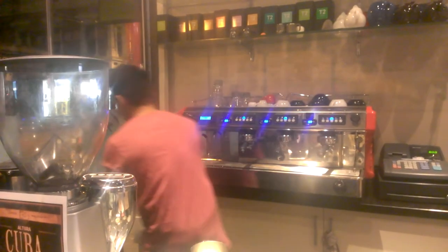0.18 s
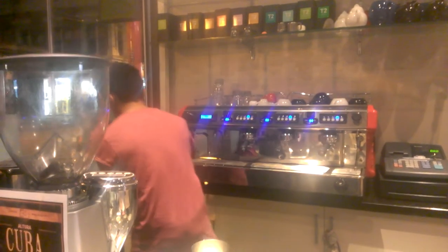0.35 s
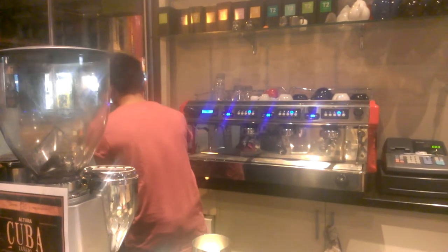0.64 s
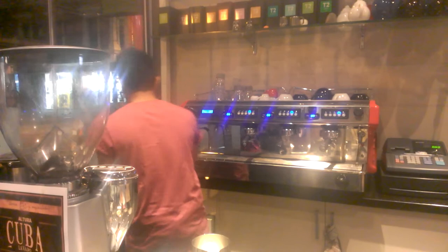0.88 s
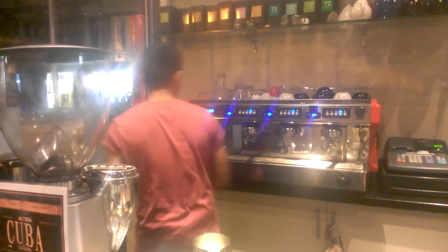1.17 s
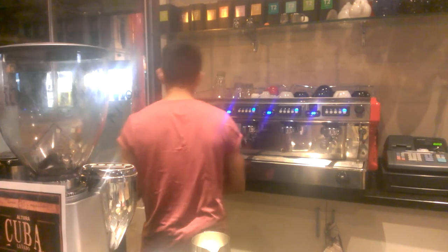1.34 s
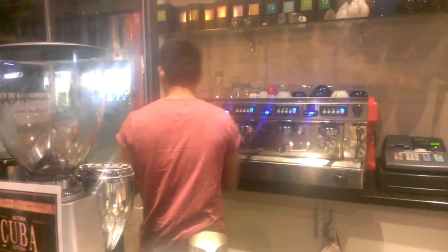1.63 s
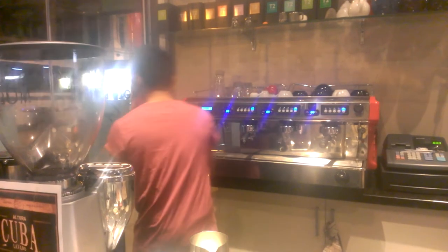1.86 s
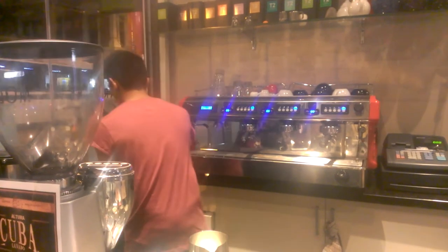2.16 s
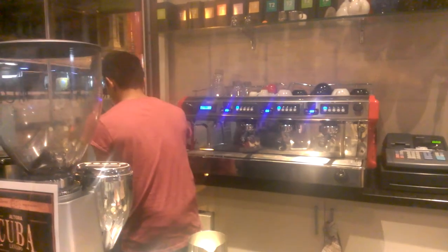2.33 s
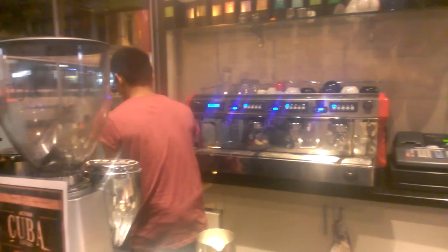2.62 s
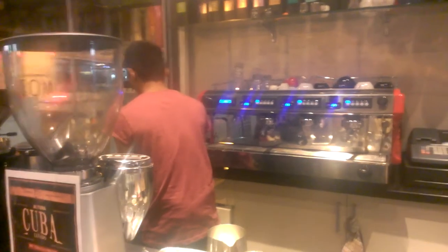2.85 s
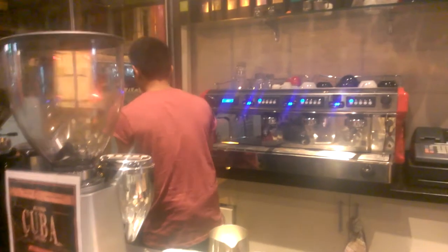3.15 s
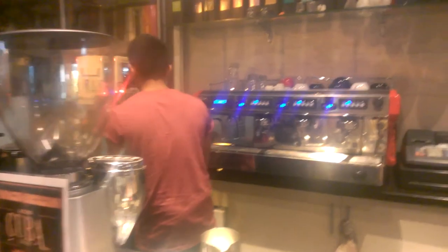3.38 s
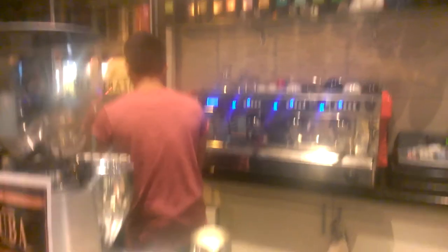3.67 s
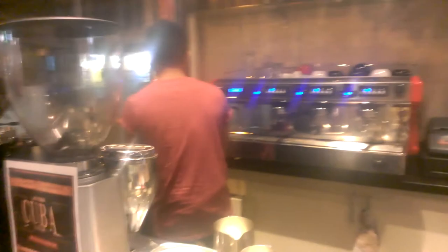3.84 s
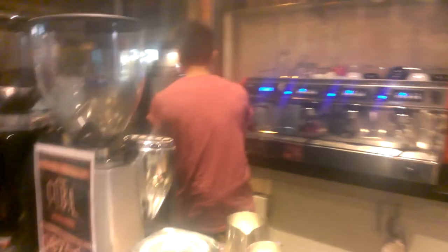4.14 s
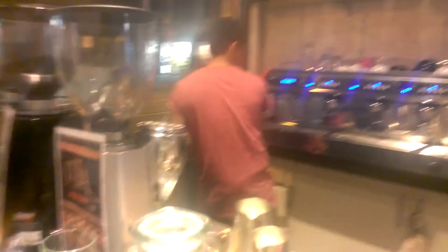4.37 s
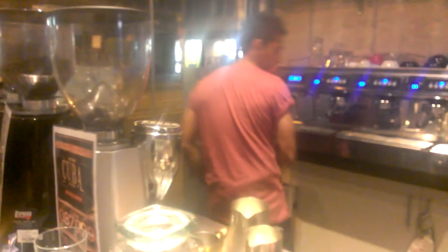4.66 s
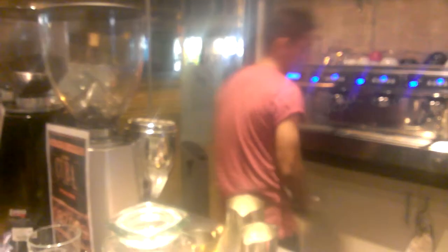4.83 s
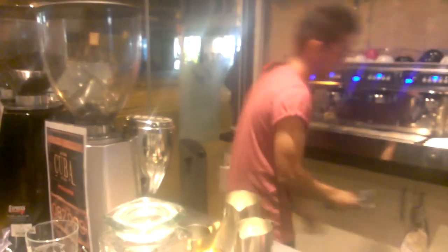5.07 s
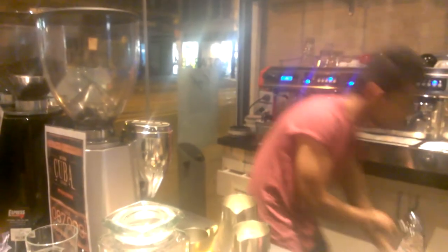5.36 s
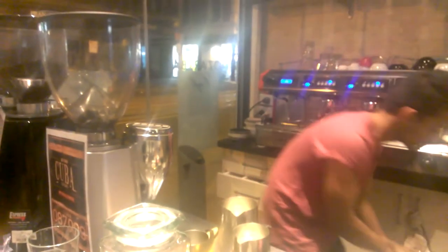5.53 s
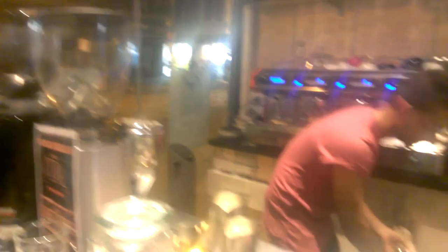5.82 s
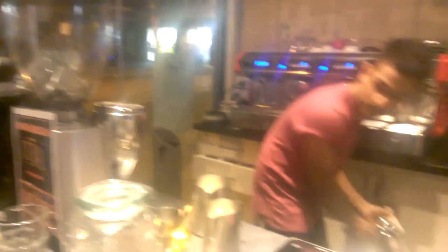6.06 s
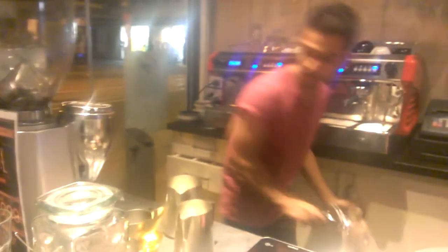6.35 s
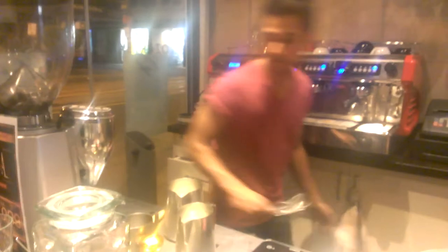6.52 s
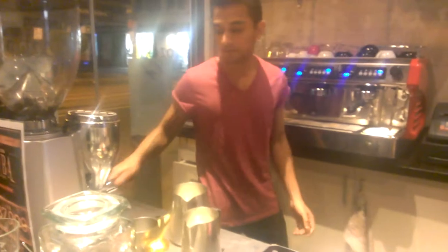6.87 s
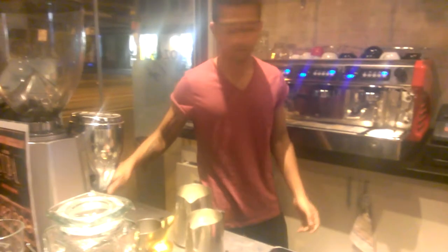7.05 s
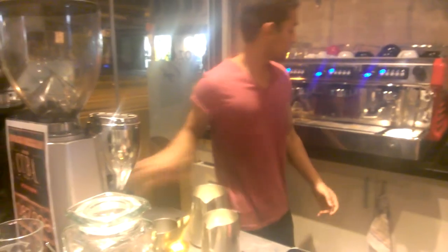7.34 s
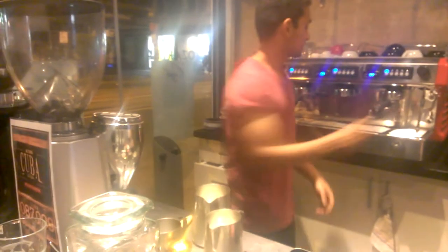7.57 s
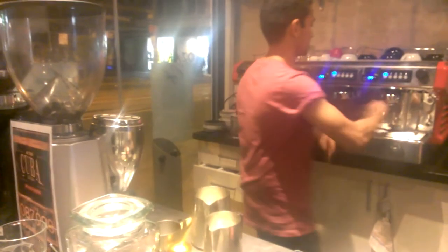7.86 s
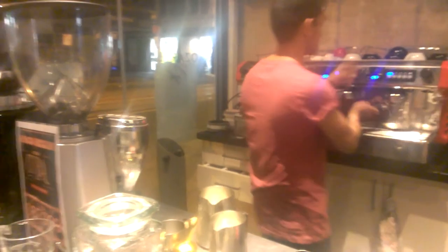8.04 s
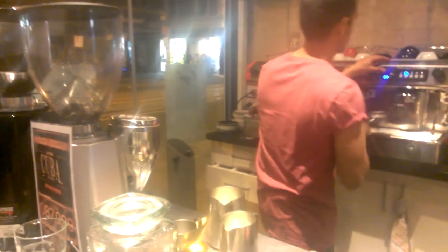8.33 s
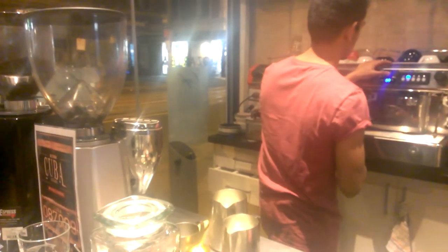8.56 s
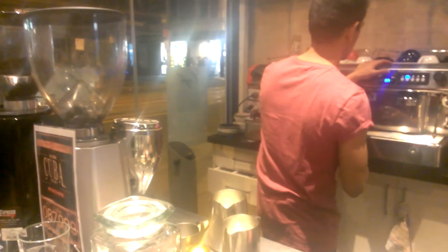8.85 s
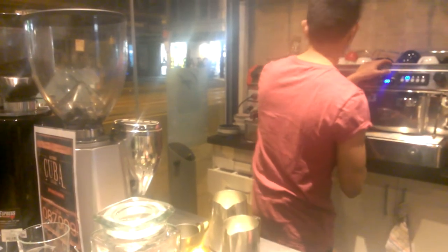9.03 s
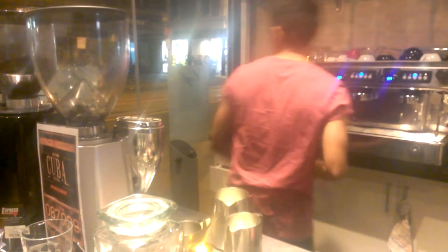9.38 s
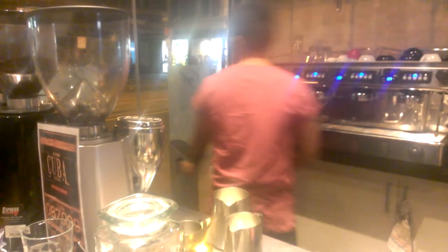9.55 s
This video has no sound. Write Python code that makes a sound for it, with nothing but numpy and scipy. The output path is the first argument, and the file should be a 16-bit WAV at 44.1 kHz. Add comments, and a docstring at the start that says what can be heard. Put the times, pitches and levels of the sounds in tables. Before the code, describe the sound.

In a hard-walled cafe, a steel filter handle bangs a knock box three times, pauses, then bangs five more times, each blow cracking, ringing and thudding with a quick rebound. Dry ticks, a faint squeak and one bright clank follow. Something lands rocking on the hollow near counter, a handle rattles, steel clinks, and a soft water hiss ends in a valve snap. Handling rustles and low ventilation throughout; the loudest blows sound squashed.

```python
"""In a hard-walled cafe a barista knocks a steel portafilter on a knock box in two bursts: crack, ring and thud.
Dry ticks follow close by, then a narrow squeak and a clank on the machine, both of steel.
Something lands and rocks on the hollow near counter; a handle rattles, steel clinks, and a short flush
of filtered noise with pump tones ends in a valve snap.
Throughout, rustles come and go over ventilation, rumble, drone and hum; a limiter flattens the loudest blows."""
import sys
import numpy as np
from scipy import signal
from scipy.fft import rfft, irfft, next_fast_len
from scipy.io import wavfile
from scipy.ndimage import uniform_filter1d

SR = 44100
rng = np.random.default_rng(int(sys.argv[2]) if len(sys.argv) > 2 else 0)


def put_to_file(sound):
    """Save the sound as 16-bit audio at rate SR, in the file named by the first command-line argument."""
    columns = np.atleast_2d(sound).T  # one column per channel
    safe = np.clip(columns, -1, 1)
    whole_steps = np.round(safe * 32767)
    wavfile.write(sys.argv[1], SR, whole_steps.astype(np.int16))


N = 427769
TAIL = 57344   # samples per struck sound
AGE, TIME = np.arange(TAIL) / SR, np.arange(N) / SR   # s

# Colours are relative spectral densities; mode and ring levels are relative too.
# Blows on the knock box: t/s, level/dB, treble tilt/(dB/octave), box thud/dB, thud f/Hz,
# rim ring/dB, basket ring/dB, loose-grip ring/dB, rebound delay/s
KNOCKS = [(.251, 2.5, 0, -15, 143, -6.5, -10, -14, .012),
          (.417, -0.5, -0.2, -13.5, 111, -6.5, -21, 0.5, 0.013), (.582, 0, 1, -12, 123, -9, -17, 0, 0.015),
          (2.179, 3.5, -0.3, -10.5, 115, -9, -8.5, -23, 0.015),
          (2.346, -2, 0.4, -10.5, 118, -14, -26, -18, .012),
          (2.511, 2, 1.4, -12.5, 148, -3.5, -4, -15, .049), (2.702, 0.5, .5, -9, 160, -4, -6, -12, .018),
          (2.907, -1, 1.7, -8.5, 163, -11, -4, -14, .016)]
# Crack of a blow: f/Hz, density/dB
KNOCK_COLOUR = [(150, -32), (330, -12), (530, -13), (790, -12), (1150, -8.5), (1600, -1.5), (2100, 2.5),
                (2650, -1), (3400, -7), (4400, 1), (5500, 0), (6500, -8.5), (7900, -23.5), (9100, -16.5),
                (11000, -27.5), (16000, -35)]
# Heavy rim of the portafilter: f/Hz, level/dB, t60/s
RIM_MODES = [(818, -7, 0.08), (1255, -5, 0.029), (1631, 0.5, 0.16), (1809, 0.5, 0.18), (2006, 3.5, 0.13),
             (2174, -2.5, 0.25), (2422, 8, 0.088), (2650, 2, 0.1), (3000, -6.5, 0.23)]
# Thin basket: f/Hz, level/dB, t60/s
BASKET_MODES = [(4230, 10.5, 0.16), (4410, -4, 0.28), (4620, 2, 0.44), (4820, -9, 0.24), (5300, -8, 0.16),
                (5530, -16, 0.14), (6470, -5, 0.27), (7250, -6.5, 0.1), (9000, -28, 0.3), (9400, -29, 0.14),
                (11400, -14, 0.12)]
# Low rim note that sings on in a loose grip: f/Hz, level/dB, t60/s
RIM_NOTE = [(2000, 3, .26), (2100, -4.5, 0.2)]
# Low basket note that sings on in a loose grip: f/Hz, level/dB, t60/s
BASKET_NOTE = [(4205, 0, .7)]
# Rebound relative to the first contact
REBOUND_DB, REBOUND_THUD_DB, REBOUND_TILT_DB_PER_OCT = -3.5, -10, -2.1
# Graze just before the first blow after a pause, relative to that blow
PAUSE_S, GRAZE_LEAD_S, GRAZE_DB, GRAZE_TILT_DB_PER_OCT = .8, .008, -12.5, -3

# Portafilter against the machine's steel: t/s, level/dB
CLANKS = [(4.271, -15.5), (4.276, -2)]
# Clank impact: f/Hz, density/dB
CLANK_COLOUR = [(100, -8), (380, -16), (780, -7), (1200, -10), (1750, 0), (2650, 1.5), (3100, -9),
                (3750, -9.5), (4250, -1.5), (5200, -1.5), (6200, -9.5), (7100, -9.5), (8000, -27),
                (9300, -20.5), (16000, -43)]
# Clank ringing: f/Hz, level/dB, t60/s
CLANK_MODES = [(1460, -5, 0.22), (1840, -7, 0.57), (2080, -7, 0.27), (2560, 0, 0.18), (2543, -4, .22),
               (2800, -2.5, 0.2), (4330, -12, 0.27), (5230, -16, .25), (6759, -2.5, 0.22), (8620, -18, .14),
               (9050, -11, 0.18)]

# Something lands and rocks on the counter: t/s, hollow thump/dB, clatter/dB, clatter tilt/(dB/octave)
BUMPS = [(7.070, -12.5, -23.5, -1.5), (7.079, -19, -24.5, 1.5), (7.106, -16, -30, -1),
         (7.130, -16.5, -25.5, 1), (7.155, -17.5, -26.5, -3), (7.184, -37, -17.5, -4),
         (7.210, -29, -24.5, -7.5)]
# Hollow counter panel: f/Hz, level/dB, t60/s
COUNTER_MODES = [(205, -7.5, 0.11), (327, 1, 0.12), (364, -2.5, 0.09), (430, 0.5, 0.045), (553, -16, 0.029)]
# Clatter impact: f/Hz, density/dB
CLATTER_COLOUR = [(150, -1), (600, 0), (850, -2.5), (1080, 0), (1400, -2), (2300, -1), (3000, -10),
                  (3800, -11), (5100, -2.5), (7500, -22), (8300, -19), (9500, -31), (16000, -36)]
# Ringing of the thing on the counter: f/Hz, level/dB, t60/s
CLATTER_MODES = [(680, 17, 0.039), (1075, 8, 0.11), (1700, -10, 0.052), (2360, -6, 0.037), (5050, -38, .05),
                 (6720, -18, 0.062), (8200, -23, .09)]
CLATTER_RING_DB = -16   # against its crack

# Bright steel touches at the group head: t/s, level/dB, treble tilt/(dB/octave), ring/dB
CLINKS = [(8.269, -29, 1.5, -1), (8.282, -11.5, 3, -6)]
# Clink impact: f/Hz, density/dB
CLINK_COLOUR = [(300, -1.5), (900, -5), (1300, -2), (1700, 5.5), (2100, -1), (2550, -4), (3300, -8.5),
                (4500, -1), (5900, 3.5), (6700, -9), (7900, -15), (9300, -4.5), (11000, -14), (16000, -28)]
# Clink ringing: f/Hz, level/dB, t60/s
CLINK_MODES = [(1590, -4, .25), (1800, -7, 0.31), (2520, -10, .25), (4600, -15, .2), (5114, -16, 0.17),
               (5970, 10, 0.12), (5780, -1, 0.19), (5740, -1, 0.32), (8802, -13, 0.14), (9200, -12, 0.16),
               (9400, -14, .18), (10360, -15, .16)]

# Water through the group head: f/Hz, density/dB
FLUSH_COLOUR = [(300, 7), (1700, 3), (3200, -2.5), (5100, 3), (7000, 1), (8500, -14), (10200, -15),
                (16000, -28)]
# Pump tones during the flush: f/Hz, level against the water/dB
PUMP_TONES = [(490, -8), (5120, -11.5), (5798, -17)]
# Rise and drain times are per SWELL_RANGE_DB
FLUSH_S, FLUSH_DB, FLUSH_RISE_S, FLUSH_SAG_DB_PER_S, DRAIN_S = 8.47, -49.5, .08, 7, 0.35
VALVE_S, VALVE_DB = 8.944, -21
# Valve snap: f/Hz, density/dB
VALVE_COLOUR = [(300, -15), (620, -32), (760, -5), (1100, -12), (1700, -1.5), (2300, 0), (3200, -0.5),
                (3900, -2), (4600, -3), (5800, -5), (7000, -14), (8300, -19), (9200, -11), (10000, -21),
                (16000, -29)]
# Valve ringing: f/Hz, level/dB, t60/s
VALVE_MODES = [(2230, 2, 0.33), (3128, -4, 0.44), (4700, 0, .25), (5717, -6, .3), (9400, -8, 0.23)]

# Light touches of a loose machine handle: t/s, level/dB
JIGGLES = [(7.872, -38), (7.897, -39), (7.952, -44)]
# Handle ringing: f/Hz, level/dB, t60/s
HANDLE_MODES = [(822, 8, .12), (1650, -3, .15), (2060, 3, 0.052), (3340, -4, .15), (4500, -2, .15),
                (5430, -9, .1)]

SQUEAK_S, SQUEAK_DB, SQUEAK_RISE_S, SQUEAK_FADE_S = 4.2, -51.5, .05, .3
# Squeak: f/Hz, density/dB
SQUEAK_COLOUR = [(900, -30), (1150, -13), (1450, -31), (1650, 12), (1900, -9), (2500, -41)]

# Dry ticks near the microphone: t/s, level/dB
TICKS = [(3.511, -31), (3.522, -42), (3.742, -48)]
# Tick: f/Hz, density/dB
TICK_COLOUR = [(1000, -38), (3500, -14), (5300, 8), (8500, -5), (11000, -18), (16000, -28)]

# Handling rustles: t of peak/s, level/dB, fade/s
RUSTLES = [(.07, -63, 0.14), (1.35, -57, 0.49), (1.73, -61, .6), (4.8, -49, 0.3), (4.94, -47.5, 0.19),
           (5.34, -49.5, 0.29), (6.19, -53, 0.13), (6.38, -54.5, 0.61), (6.7, -55, 0.11),
           (7.72, -54.5, 0.3), (7.93, -47.5, 0.38), (9.62, -52.5, 0.3)]
# Rustle: f/Hz, density/dB
RUSTLE_COLOUR = [(800, 1), (3300, -7), (4600, 4), (6200, -2), (8000, -15.5), (12000, -25), (16000, -30)]
RUSTLE_RISE_PER_FADE = 0.49
SWELL_RANGE_DB = 20

# Ventilation: f/Hz, density/dB
AIR_COLOUR = [(20, -5), (45, -4.5), (70, -15), (100, -19), (135, -13), (190, -21), (270, -15.5),
              (400, -20.5), (850, -21.5), (1150, -24), (1700, -20), (3200, -32), (4700, -28), (6000, -34),
              (7800, -59), (16000, -64)]
# Ventilation: t/s, level/dB
AIR_LEVEL = [(0, -47), (1.8, -44.5), (5.3, -49), (9.7, -50)]
# Low rumble: f/Hz, density/dB
RUMBLE_COLOUR = [(12, 5.5), (24, 16), (33, 9), (45, -5), (70, -24), (200, -63)]
# Low rumble: t/s, level/dB
RUMBLE_LEVEL = [(0.0, -41.5), (1.05, -41), (2.37, -46), (3.51, -53.5), (4.24, -46.5), (5.54, -51),
                (5.75, -57.5), (9.18, -53), (9.7, -60)]
# Dull drone from outside: f/Hz, density/dB
DRONE_COLOUR = [(70, -43), (125, -5), (165, 0), (220, -8.5), (330, -20), (700, -51)]
# Steady drone level, then its one swell
DRONE_DB = -58.5
DRONE_SWELL_S, DRONE_SWELL_DB, DRONE_RISE_S, DRONE_FADE_S = 5.2, -49.5, .7, 0.28
# Fans and coolers: f/Hz, level/dB
HUM_TONES = [(97, -60), (176, -62), (242, -63), (915, -66), (1680, -68)]

# Wall reverberation: f/Hz, t60/s
ROOM_T60 = [(100, 0.56), (400, 0.71), (1000, 0.86), (2000, 0.92), (4300, 1), (6000, 0.78), (9000, 0.63),
            (12000, 0.46), (16000, 0.61)]
CUTOFF_HZ = 15900


def knocks(walls):
    """Every blow lands hard and rebounds once, softer and duller; a burst opens with a graze."""
    out, previous_s = np.zeros(N), -np.inf
    for s, db, tilt_db, thud_db, thud_hz, rim_db, basket_db, free_db, rebound_s in KNOCKS:
        body = thud_hz, rim_db, basket_db, free_db
        if s - previous_s > PAUSE_S:
            graze = knock_contact(walls, tilt_db + GRAZE_TILT_DB_PER_OCT, thud_db, *body)
            add(out, s - GRAZE_LEAD_S, from_db(db + GRAZE_DB) * graze)
        add(out, s, from_db(db) * knock_contact(walls, tilt_db, thud_db, *body))
        rebound = knock_contact(walls, tilt_db + REBOUND_TILT_DB_PER_OCT, thud_db + REBOUND_THUD_DB, *body)
        add(out, s + rebound_s, from_db(db + REBOUND_DB) * rebound)
        previous_s = s
    return out


def knock_contact(walls, tilt_db, thud_db, thud_hz, rim_db, basket_db, free_db):
    """Steel cracks on the bar and rings while the box thuds; the barista's body shields the direct sound."""
    radiation = signal.butter(2, 100, "high", fs=SR, output="sos")   # a small box radiates little deep bass
    box_modes = [(thud_hz, 0, .05), (2.02 * thud_hz, -5, .025)]   # fundamental, first overtone
    thud = signal.sosfilt(radiation, ring(box_modes, scatter_db=-1.5))

    rim = ring(RIM_MODES, scatter_db=4.5, split=0.0264, count=3)
    rim += from_db(free_db) * ring(RIM_NOTE, scatter_db=-4, split=0.0136, count=3)
    basket = ring(BASKET_MODES, scatter_db=1.0, split=0.01955, count=4)
    basket += from_db(free_db) * ring(BASKET_NOTE, scatter_db=1, split=0.00301, count=3)

    blow = crack(KNOCK_COLOUR, tilt_db) + from_db(thud_db) * thud
    blow += from_db(rim_db) * rim + from_db(basket_db) * basket
    paths = unit(walls + 1.77 * echoes())   # each contact is at a slightly different spot
    return in_room(blow, paths, direct_db=-5, early_db=13.5, early_t60=0.19, wall_db=17)


def clanks(walls):
    """Portafilter on machine steel: a grazing touch, then the full blow, each a crack plus ringing modes."""
    out = np.zeros(N)
    for s, db in CLANKS:
        ringing = ring(CLANK_MODES, scatter_db=0.5, split=0.0035, count=3)
        blow = crack(CLANK_COLOUR, 0) + from_db(-9.0) * ringing
        add(out, s, from_db(db) * in_room(blow, walls, direct_db=-3, early_db=16, early_t60=0.1, wall_db=20))
    return out


def bumps(walls):
    """The hollow counter thumps, near and fairly dry, as the thing on it clatters at each touch."""
    out = np.zeros(N)
    radiation = signal.butter(3, 180, "high", fs=SR, output="sos")   # a panel radiates little below its first mode
    for s, thump_db, clatter_db, tilt_db in BUMPS:
        panel = ring(COUNTER_MODES, scatter_db=4.5, split=0.035)
        thump = from_db(thump_db) * signal.sosfilt(radiation, panel)
        ringing = ring(CLATTER_MODES, scatter_db=5, split=0.012, count=3)
        touch = crack(CLATTER_COLOUR, tilt_db) + from_db(CLATTER_RING_DB) * ringing
        clatter = from_db(clatter_db) * touch
        add(out, s, in_room(thump, walls, direct_db=20.0, early_db=1, early_t60=0.11, wall_db=11.5))
        add(out, s, in_room(clatter, walls, direct_db=12, early_db=18.5, early_t60=0.064, wall_db=18.0))
    return out


def clinks(walls):
    """Light, bright touches of steel on steel: a crack plus ringing modes."""
    out = np.zeros(N)
    for s, db, tilt_db, ring_db in CLINKS:
        ringing = ring(CLINK_MODES, scatter_db=0.0, split=0.0113, count=4)
        touch = crack(CLINK_COLOUR, tilt_db) + from_db(ring_db) * ringing
        add(out, s, from_db(db) * in_room(touch, walls, direct_db=-1, early_db=15.5, early_t60=0.079, wall_db=19.0))
    return out


def flush(walls):
    """Water hisses from the group head, easing off, while the pump sings; the valve snaps and it drains."""
    opening = swell(FLUSH_S, FLUSH_RISE_S, np.inf)
    draining = swell(VALVE_S, np.inf, DRAIN_S)
    sagging = from_db(FLUSH_DB - FLUSH_SAG_DB_PER_S * np.maximum(TIME - FLUSH_S, 0))
    out = opening * draining * sagging * (noise(FLUSH_COLOUR) + tones(PUMP_TONES, wander_hz=3.5))
    ringing = ring(VALVE_MODES, scatter_db=3.0, split=.006, count=4)
    snap = crack(VALVE_COLOUR, 0) + from_db(-14) * ringing
    snap = in_room(snap, walls, direct_db=-14, early_db=17.5, early_t60=0.2, wall_db=19.0)
    add(out, VALVE_S, from_db(VALVE_DB) * snap)
    return out


def jiggles(walls):
    """Light touches of a loose metal handle, heard mostly by way of reflections."""
    out = np.zeros(N)
    for s, db in JIGGLES:
        touch = ring(HANDLE_MODES, scatter_db=2, split=.008, count=2)
        add(out, s, from_db(db) * in_room(touch, walls, direct_db=7, early_db=19, early_t60=.1, wall_db=20))
    return out


def squeak():
    """A short, narrow noise band, as of steel sliding on steel."""
    return from_db(SQUEAK_DB) * swell(SQUEAK_S, SQUEAK_RISE_S, SQUEAK_FADE_S) * noise(SQUEAK_COLOUR)


def ticks(walls):
    """Tiny scuffs that are gone within a few hundredths of a second."""
    out = np.zeros(N)
    for s, db in TICKS:
        tick = in_room(crack(TICK_COLOUR, 0), walls, direct_db=16, early_db=23, early_t60=0.081, wall_db=4)
        add(out, s, from_db(db) * tick)
    return out


def rustles():
    """Each movement of the hands makes an uneven hiss that builds quickly and fades more slowly."""
    power = np.zeros(N)
    for s, db, fade_s in RUSTLES:
        power += (from_db(db) * swell(s, RUSTLE_RISE_PER_FADE * fade_s, fade_s)) ** 2
    return np.sqrt(power) * noise(RUSTLE_COLOUR) * flicker(depth_db=1.5, per_s=90)


def background():
    """Coloured noise for ventilation, rumble and drone; wandering sines for humming motors."""
    air = level(AIR_LEVEL) * noise(AIR_COLOUR) * flicker(depth_db=1.34, per_s=14)
    rumble = level(RUMBLE_LEVEL) * noise(RUMBLE_COLOUR)
    drone_swell = from_db(DRONE_SWELL_DB) * swell(DRONE_SWELL_S, DRONE_RISE_S, DRONE_FADE_S)
    drone = np.hypot(from_db(DRONE_DB), drone_swell) * noise(DRONE_COLOUR)
    return air + rumble + drone + tones(HUM_TONES, wander_hz=3.98)


def echoes():
    """Dense wall reflections that build up quickly, each band dying at its own rate."""
    white, hz = rfft(rng.standard_normal(TAIL)), np.fft.rfftfreq(TAIL, 1 / SR)
    centres_hz, t60s = np.transpose(ROOM_T60)
    tail = np.zeros(TAIL)
    for share, t60 in zip(np.eye(len(centres_hz)), t60s):
        band = irfft(white * at_hz(np.c_[centres_hz, share], hz))   # overlapping triangular bands
        tail += band * from_db(-60 * AGE / t60)
    return unit(tail * (1 - np.exp(-AGE / 0.0012)))


def in_room(sound, walls, direct_db, early_db, early_t60, wall_db):
    """Direct sound, a spray of reflections from the counter and machine, and the walls."""
    early = unit(rng.standard_normal(TAIL) * from_db(-60 * AGE / early_t60))
    path = from_db(early_db) * early + from_db(wall_db) * walls
    path[0] += from_db(direct_db)
    return signal.fftconvolve(sound, path)[:TAIL]


def crack(colour, tilt_db):
    """One contact: a minimum-phase pulse of a colour, tilted above 1 kHz by tilt_db per octave."""
    hz = np.fft.rfftfreq(TAIL, 1 / SR)
    tilted_db = at_hz(colour, hz) + tilt_db * np.log2(np.clip(hz, 1000, None) / 1000)
    cepstrum = irfft(np.log(from_db(tilted_db)))
    causal = 2 * cepstrum[:TAIL // 2]   # folding the cepstrum makes the phase minimum
    return unit(irfft(np.exp(rfft(causal, TAIL))))


def ring(modes, scatter_db, split=0, count=1):
    """Each mode is a cluster of close partials whose strengths and tuning change with grip and contact point."""
    out, age = np.zeros(TAIL), AGE[:TAIL // 2]
    for hz, db, t60 in modes:
        pitch, strength, sign = rng.standard_normal((3, count, 1))
        phase = (2 * np.pi * hz * (1 + split * pitch) * age).astype(np.float32)
        partials = np.sign(sign) * from_db(scatter_db * strength) * np.sin(phase)
        out[:len(age)] += from_db(db - 60 * age / t60) * np.sum(partials, axis=0)
    return unit(out)


def noise(colour):
    """Steady noise of a given colour, rms 1."""
    size = next_fast_len(N)
    gain = from_db(at_hz(colour, np.fft.rfftfreq(size, 1 / SR)))
    coloured = irfft(rfft(rng.standard_normal(size)) * gain, size)[:N]
    return unit(coloured) * np.sqrt(N)


def tones(lines, wander_hz):
    """Sines at rms levels in dB whose pitch wanders at random."""
    knots_s, out = np.linspace(0, N / SR, num=120), np.zeros(N)
    for hz, db in lines:
        pitch_hz = hz + wander_hz * np.interp(TIME, knots_s, rng.standard_normal(len(knots_s)))
        out += from_db(db) * np.sqrt(2) * np.sin(2 * np.pi * np.cumsum(pitch_hz) / SR)
    return out


def flicker(depth_db, per_s):
    """A gain that wanders at random, per_s new values a second."""
    return from_db(depth_db * np.interp(TIME * per_s, np.arange(N), rng.standard_normal(N)))


def swell(s, rise_s, fade_s):
    """A gain that climbs to one at time s and dies away, by SWELL_RANGE_DB per rise and per fade time."""
    distance = np.maximum((s - TIME) / rise_s, (TIME - s) / fade_s)
    return from_db(-SWELL_RANGE_DB * distance.clip(0, 10))


def level(rows):
    """Gain over time from t/s, level/dB rows."""
    return from_db(np.interp(TIME, *np.transpose(rows)))


def at_hz(points, hz):
    """Read a table along log frequency."""
    f, value = np.transpose(points)
    return np.interp(np.log(np.maximum(hz, 1)), np.log(f), value)


def add(out, s, sound):
    """Mix a sound in from time s."""
    i = round(s * SR)
    out[i:i + len(sound)] += sound[:N - i]


def unit(x):
    """Scale to an energy of one."""
    return x / np.sqrt(np.sum(x ** 2) + 1e-20)


def from_db(db):
    """Amplitude from dB."""
    return 10 ** (np.asarray(db) / 20)


def scene():
    """All sources in one room, the same in both channels."""
    walls = echoes()
    contacts = knocks(walls) + clanks(walls) + bumps(walls) + clinks(walls) + jiggles(walls) + ticks(walls)
    mono = contacts + flush(walls) + squeak() + rustles() + background()
    return np.array([mono, mono])


def limiter(x, ceiling_db, release_db_per_s):
    """The gain drops within milliseconds when the level passes the ceiling and recovers steadily."""
    power = uniform_filter1d(x[0] ** 2, size=180)   # 4 ms
    over_db = np.maximum(10 * np.log10(np.maximum(power, 1e-12)) - ceiling_db, 0)
    release_db = release_db_per_s * TIME
    held_db = np.maximum.accumulate(over_db + release_db) - release_db
    return x * from_db(-uniform_filter1d(held_db, size=90))   # 2 ms


def record(dry):
    """Limiter, rounded peaks and a steep top cut."""
    limited = limiter(dry, ceiling_db=-12.0, release_db_per_s=40)
    top = .75
    rounded = top * np.tanh(limited / top)
    top_cut = signal.ellip(10, .1, 80, CUTOFF_HZ, fs=SR, output="sos")
    return signal.sosfilt(top_cut, rounded)


dry = scene()
out = record(dry)
put_to_file(out)
```